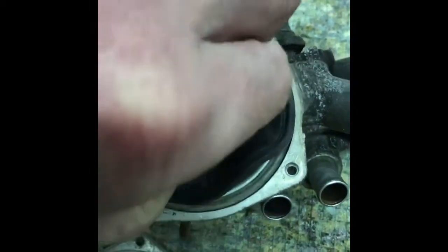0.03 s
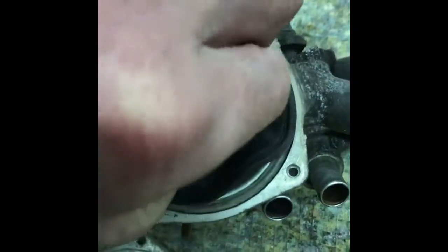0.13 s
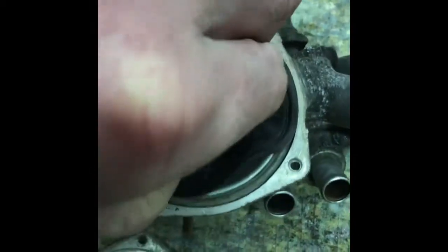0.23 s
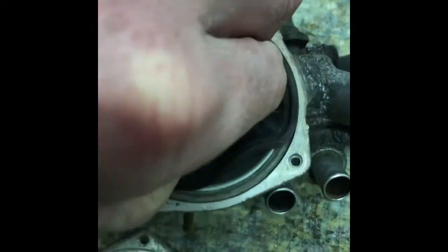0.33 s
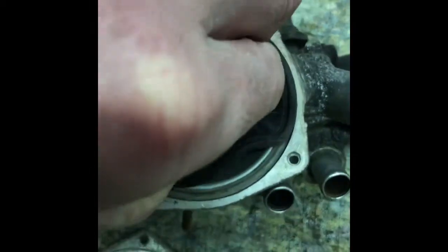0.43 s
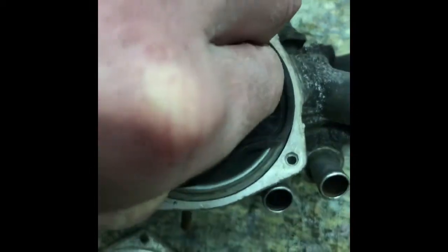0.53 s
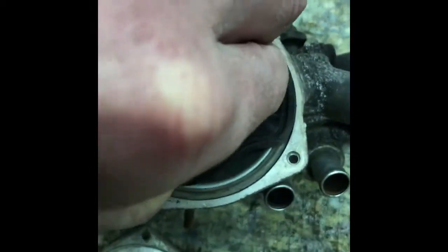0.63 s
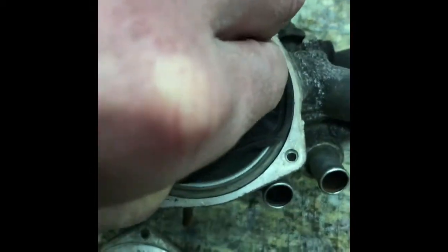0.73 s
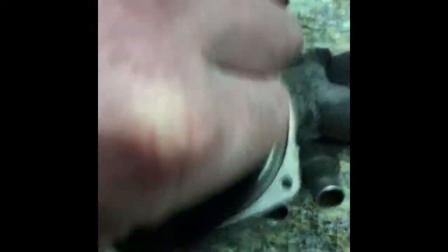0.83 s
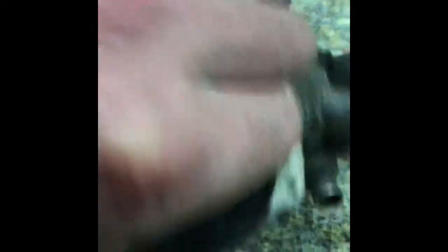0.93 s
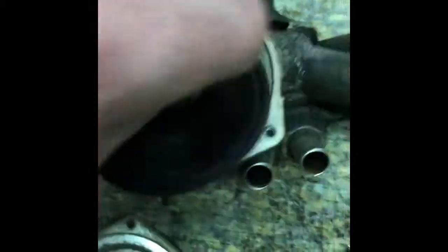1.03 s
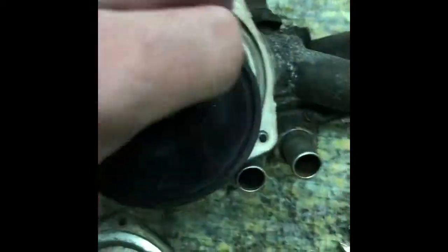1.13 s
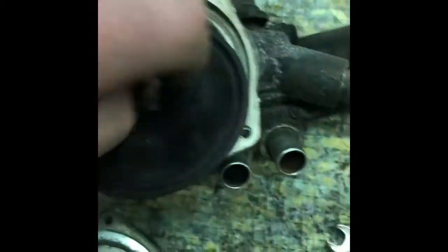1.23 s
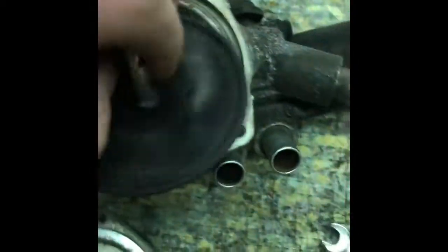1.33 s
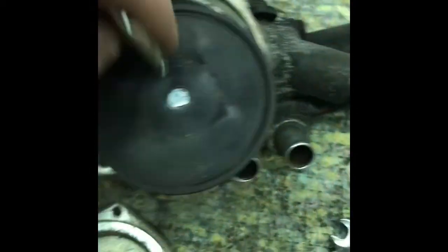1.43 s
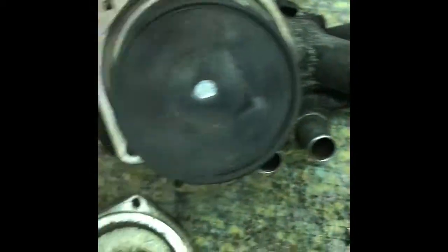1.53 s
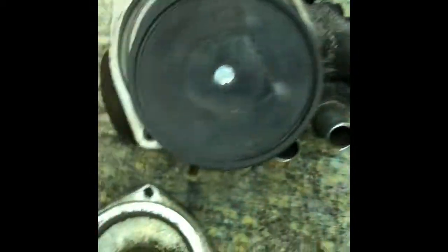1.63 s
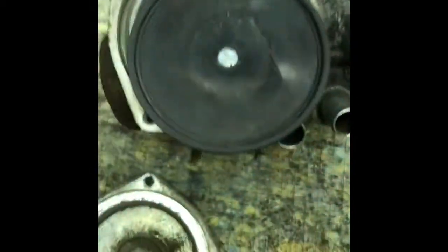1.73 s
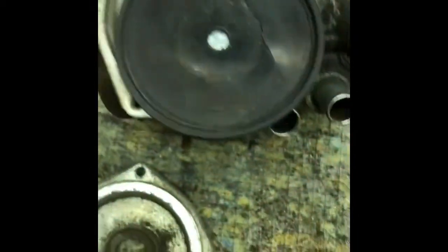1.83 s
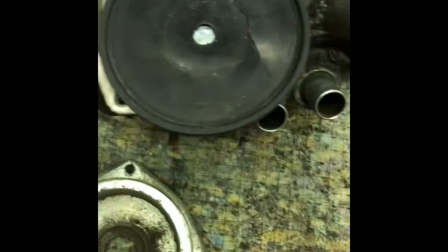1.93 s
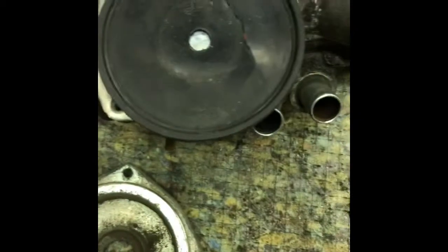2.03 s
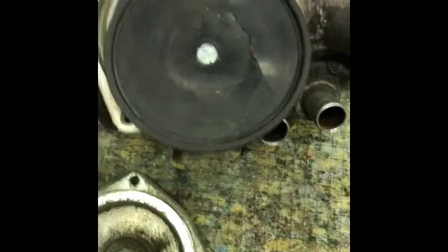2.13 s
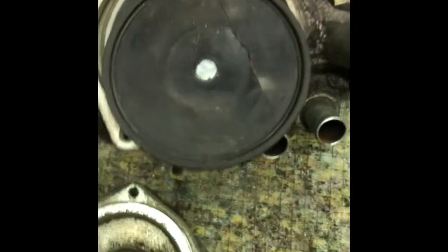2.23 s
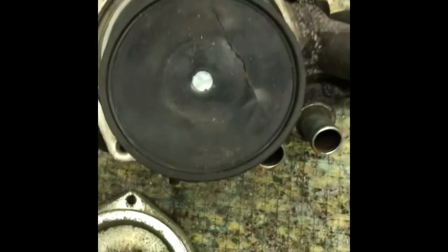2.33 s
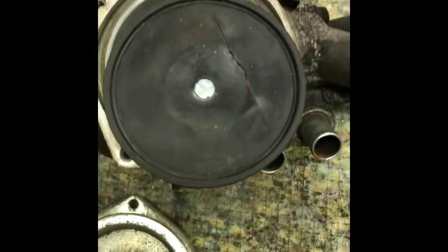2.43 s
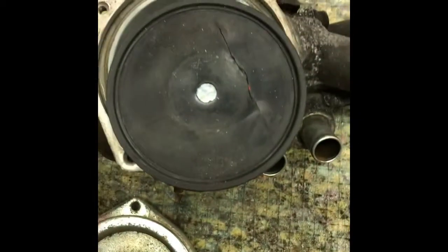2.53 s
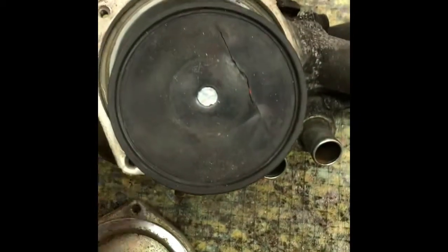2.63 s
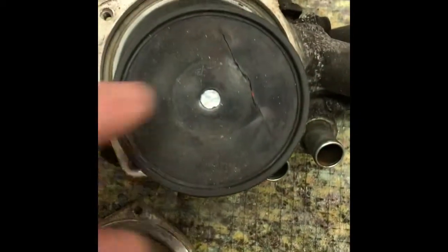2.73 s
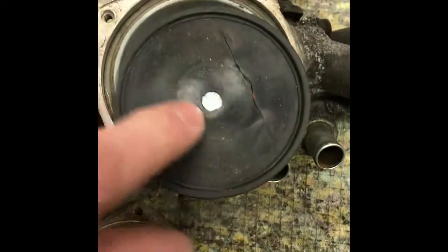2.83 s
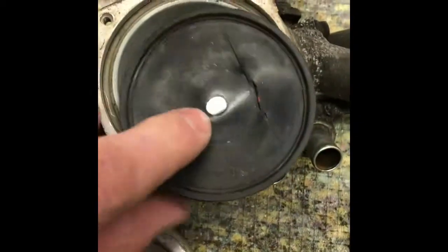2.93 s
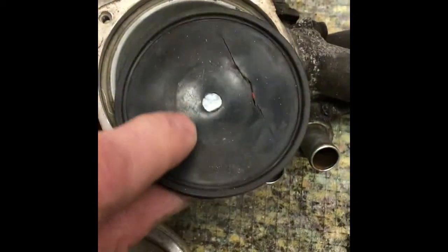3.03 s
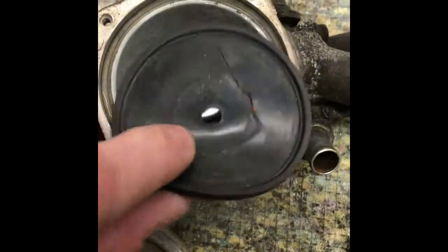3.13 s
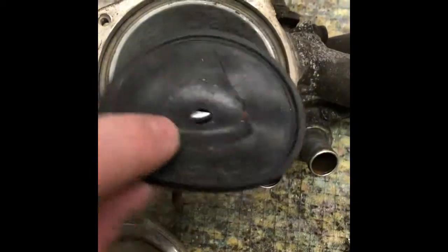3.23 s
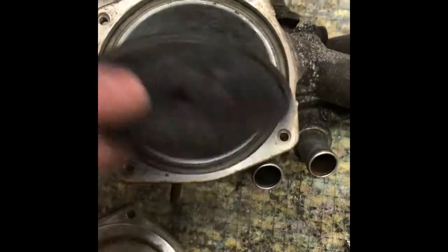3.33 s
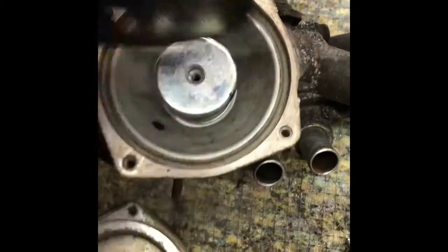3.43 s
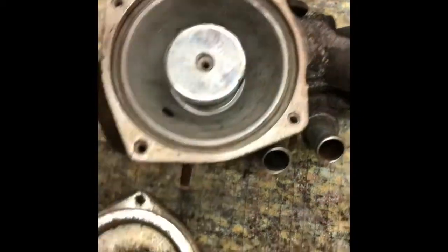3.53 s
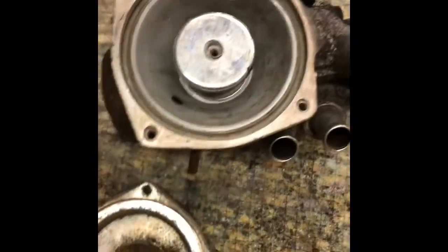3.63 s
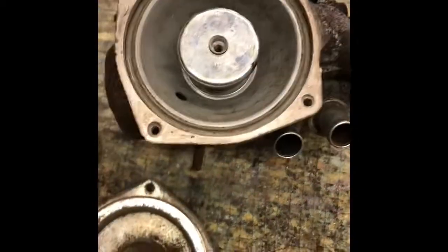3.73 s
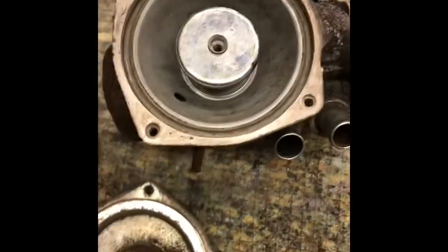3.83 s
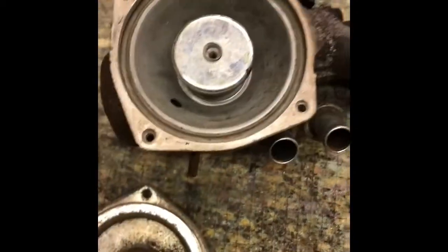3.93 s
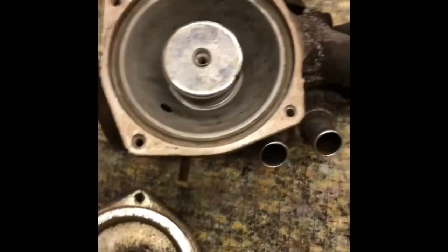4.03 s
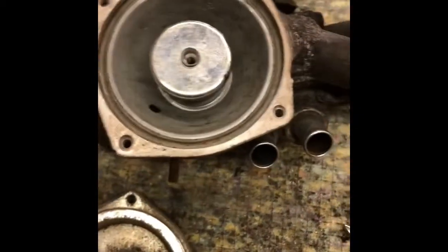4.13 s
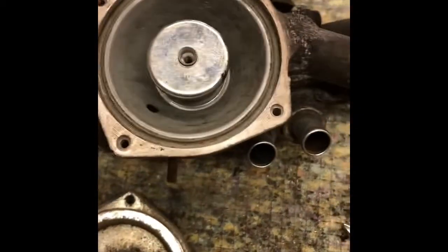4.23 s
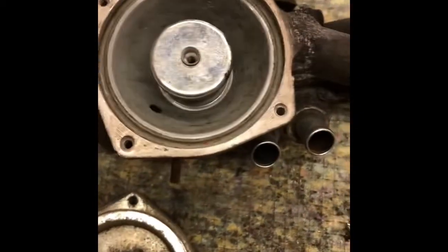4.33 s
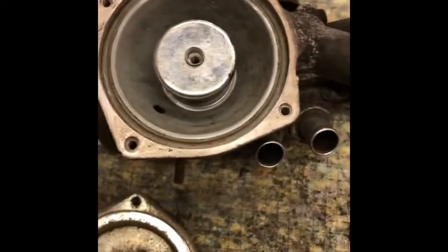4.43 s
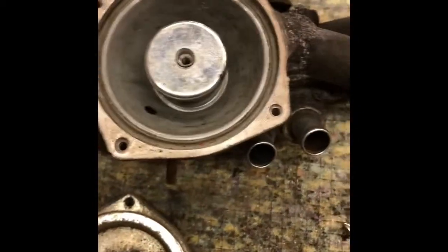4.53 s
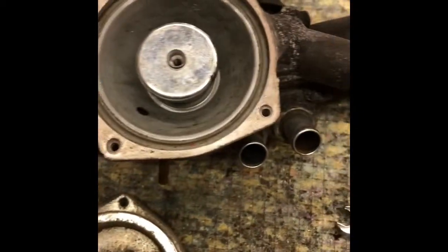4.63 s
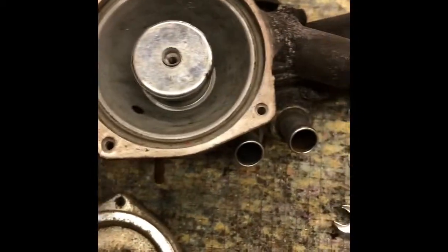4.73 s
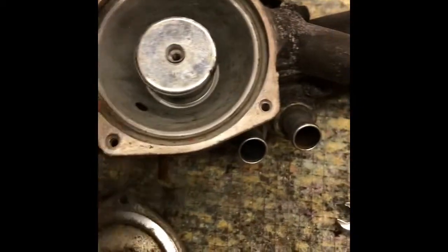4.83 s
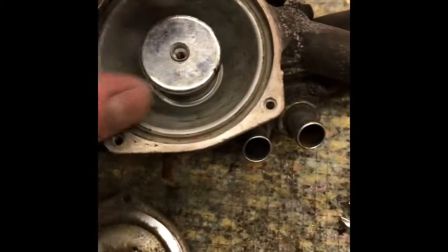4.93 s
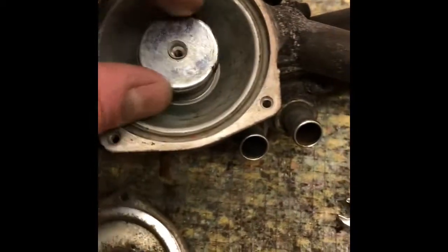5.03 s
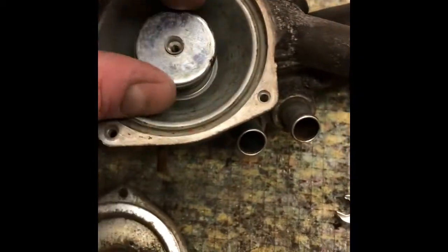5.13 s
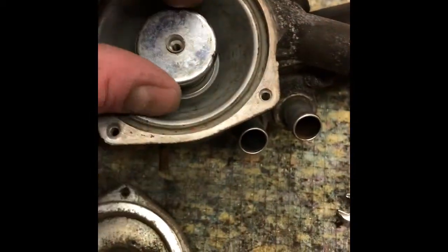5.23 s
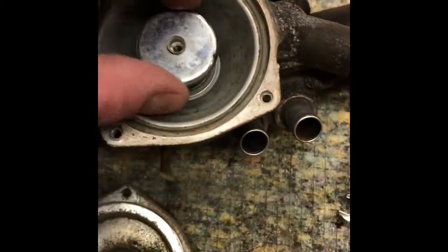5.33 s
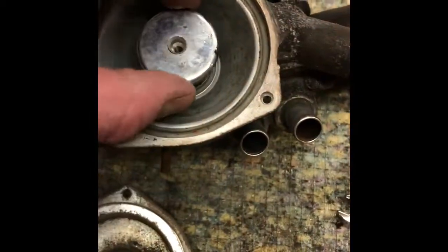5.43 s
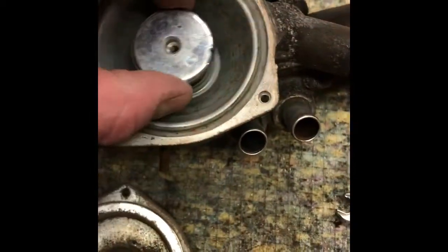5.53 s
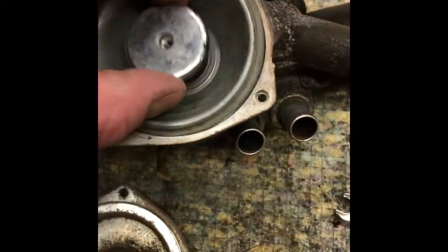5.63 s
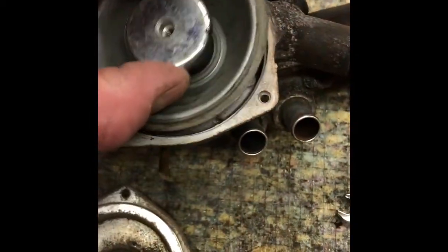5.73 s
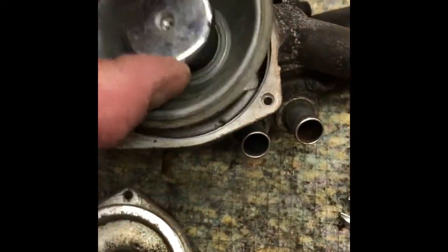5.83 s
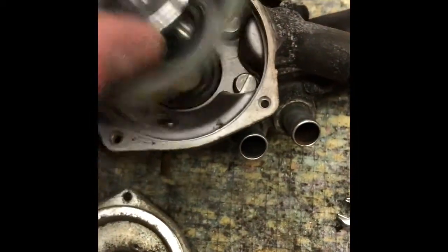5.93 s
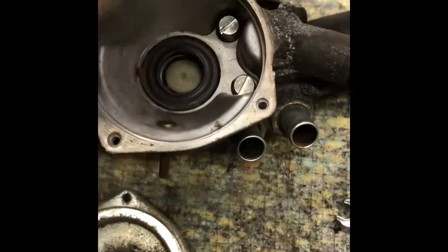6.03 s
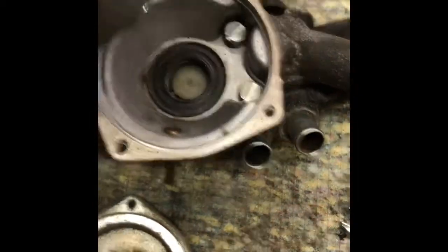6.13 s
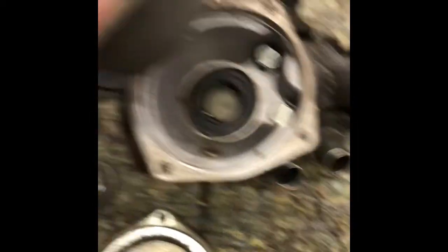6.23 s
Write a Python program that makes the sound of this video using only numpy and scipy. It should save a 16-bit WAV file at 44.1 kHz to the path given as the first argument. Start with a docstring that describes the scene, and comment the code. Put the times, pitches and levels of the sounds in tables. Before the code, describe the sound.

A small workshop, heard very close at the bench, with a quiet wavering low hum and soft dull air throughout. At 0.05 s a light hollow metal knock, with a little tick and rub near 0.3. From 0.83 to 0.91 a loud tight clatter of metal blows, with a dull bench thud; another firm knock comes at 1.08. Small rubbery snaps follow at 1.2 and 1.48 amid dry rubbing, then a metallic clack at 1.81. Faint finger rubs lead to a crisp, dead rubber snap at 2.93 and brief rubbing until 3.3. Then it is nearly still, with slight grip rustles and a tiny pop at 4.55. At 5.1 a thin fingernail tick; from 5.15 a piston rasps in short fits, clacks at 5.53, and clinks free brightly at 5.74. Light fingertip brushes make it sing faintly at 6.0 and 6.27. The echo is weak and short.

```python
"""In a workshop, on a bench, a cast metal valve housing is taken apart by hand, close to the listener.
It knocks and rattles as its lid comes off: short bursts of noise ring its hollow and its walls.
A rubber diaphragm snaps loose, fingers rub, and a small piston scrapes and clinks out of its bore:
noise shaped by rubber and bore, and a set of fading tones for the piston.
Wavering tones for mains equipment and a fan, and soft filtered noise for the air, lie underneath."""
import sys
import numpy as np
from scipy import signal
from scipy.fft import rfft, irfft
from scipy.io import wavfile
from scipy.ndimage import uniform_filter1d

SR = 44100
rng = np.random.default_rng(int(sys.argv[2]) if len(sys.argv) > 2 else 0)


def inscribe(sig):
    """Save sig as 16-bit PCM at rate SR to the path in sys.argv[1].

    A 1-D sig is mono; a 2-D sig holds one channel per row.
    Samples are clipped to [-1, 1] before scaling.
    """
    pcm = np.round(np.clip(np.atleast_2d(sig).T, -1, 1) * 32767)
    wavfile.write(sys.argv[1], SR, pcm.astype(np.int16))


N = 276948
T = np.arange(N) / SR  # time through the whole scene, s
BLOW_T = np.arange(int(.45 * SR)) / SR  # time since a single blow, s


def undb(db):
    """Turn decibels into a gain."""
    return 10 ** (np.asarray(db) / 20)


def unit(x):
    """Scale to an average (rms) level of 1."""
    return x / np.sqrt(np.mean(x ** 2))


def blow_level(x, db):
    """Give a blow the energy of a 5 ms sound at this level."""
    return x * undb(db) * np.sqrt(.005 * SR / np.sum(x ** 2))


def fade(t, t60):
    """Die away smoothly, dropping 60 dB in t60 seconds."""
    return np.exp(-np.log(1000) * t / t60)


def band(x, lo_hz, hi_hz, order=3):
    """Keep only the pitches between two limits."""
    return signal.sosfilt(signal.butter(order, [lo_hz, min(hi_hz, SR / 2 - 1)], "band", fs=SR, output="sos"), x)


def resonate(x, modes):
    """Pass a sound through damped resonances (f/Hz, width/Hz, level/dB) and add them up."""
    return sum(undb(db) * signal.lfilter(*signal.iirpeak(hz, hz / width, SR), x) for hz, width, db in modes)


def add(out, s, x):
    """Mix x in at time s."""
    i = max(int(s * SR), 0)
    out[i:i + len(x)] += x[:max(N - i, 0)]


def walk(rate):
    """Wander smoothly at random, about rate new values a second, with spread 1."""
    k = int(SR / rate)
    steps = np.repeat(rng.standard_normal(N // k + 1), k)
    return unit(uniform_filter1d(steps, k)[:N])


def contact(t, t60, build_s=0.00038, tail_db=-27, tail_t60=0.058):
    """Metal meets metal: a dense crack builds quickly, then weaker chatter lasts longer."""
    noise = rng.standard_normal(len(t)) * (1 - np.exp(-t / build_s))
    return noise * (fade(t, t60) + undb(tail_db) * fade(t, tail_t60))


def grit(rough_db, rate):
    """Friction: surface grains catch and let go at random, so the noise is uneven."""
    return unit(rng.standard_normal(N) * undb(rough_db * walk(rate)))


def strokes(rows):
    """Level of the hand's strokes (peak t/s, length/s, level/dB): each swells and dies away alike."""
    rise_share = .43  # part of a stroke spent swelling
    power = 0
    for s, length, db in rows:
        u = (T - s) / (length * np.where(T < s, rise_share, 1 - rise_share))
        power = power + undb(2 * db) * np.exp(-np.minimum(2 * u ** 2, 40))
    return np.sqrt(power)


# hum of mains equipment and a fan: f/Hz, level/dB, waver of the pitch/Hz
HUM_TONES = [(126, -73, 0.26), (162, -69.5, 2.2), (204.5, -57.5, 1.3), (240.5, -58.5, .3), (292.5, -69, 3),
             (355, -73.5, 0.29), (464, -77.5, 0.51)]
# colour of the workshop air: f/Hz, relative level in each Hz/dB
AIR_COLOUR = [(20, -28), (33, -23), (48, -15.5), (90, -7.5), (140, -11), (200, 3), (265, -1.5), (400, -9.5),
              (700, -18.5), (920, -16.5), (2000, -29), (2800, -29.5), (7000, -36.5), (16000, -42.5)]


def workshop(flutter_db=2.0, air_db=-56.5):
    """Hum tones waver in pitch and strength over a soft rush of air, which is filtered noise."""
    tones = np.zeros(N)
    for hz, db, waver in HUM_TONES:
        tone = np.sin(2 * np.pi * np.cumsum(hz + waver * walk(12)) / SR)
        tones += undb(db + flutter_db * walk(5)) * unit(tone)
    hz, db = np.transpose(AIR_COLOUR)
    bins_hz = np.arange(N // 2 + 1) * SR / N
    colour = undb(np.interp(np.log(bins_hz + 1), np.log(hz), db))
    air = unit(irfft(rfft(rng.standard_normal(N)) * colour, N))
    return tones + air * undb(air_db + .5 * walk(4.2))


def room(x, wet_db=-21, bright_db=-26, low_t60=0.56, treble_t60=0.31, build_s=0.0046):
    """A cluttered workshop echoes weakly, and the echo loses its treble first."""
    t = np.arange(SR) / SR
    noise = rng.standard_normal(SR) * (1 - np.exp(-t / build_s))
    low, high = noise * fade(t, low_t60), noise * fade(t, treble_t60)
    tail = undb(wet_db) * band(low / np.linalg.norm(low), 200, 4500, order=2)
    tail += undb(bright_db) * band(high / np.linalg.norm(high), 4100, 11000, order=2)
    return signal.fftconvolve(x, tail)[:N]


# faint thin squeaks: t/s, length/s, start f/Hz, middle f/Hz, end f/Hz, level/dB
SQUEAK_ARCHES = [(1.311, 0.16, 11300, 11160, 11700, -73.5), (1.592, 0.13, 7300, 7210, 7340, -78.5),
                 (2.635, 0.24, 12300, 13400, 13180, -84), (2.95, 0.31, 11900, 12000, 11400, -83),
                 (5.108, 0.0049, 11400, 10930, 10900, -50)]


def squeaks(waver=0.007, wander=0.009):
    """Thin unsteady whistles follow a curve in pitch and wander around it, fast and slow."""
    out = np.zeros(N)
    for s, length, *pitch, db in SQUEAK_ARCHES:
        u = np.linspace(0, 1, int(length * SR))
        arch = np.polyval(np.polyfit([0, .5, 1], pitch, 2), u)
        hz = arch * (1 + waver * walk(600) + wander * walk(17))[:len(u)]
        whistle = unit(np.sin(np.pi * u) * np.sin(2 * np.pi * np.cumsum(hz) / SR))
        add(out, s, undb(db + 4 * walk(63)[:len(u)]) * whistle)
    return out


# the casting rocks on the bench: t/s, level before the last filter/dB
BENCH_THUMPS = [(.829, -31.5), (0.852, -40.5), (0.907, -54)]


def thumps(t60=0.12):
    """The bench top answers the heavy blows with a dull thud of low noise."""
    out = np.zeros(N)
    for s, db in BENCH_THUMPS:
        thud = rng.standard_normal(len(BLOW_T)) * fade(BLOW_T, t60)
        add(out, s, blow_level(band(thud, 85, 340, order=1), db))
    return band(out, 30, 300)


def nail(nail_s=5.1092, nail_db=-53, t60=0.009):
    """A fingernail catches the piston's rim: one thin dry tick."""
    out = np.zeros(N)
    tick = band(contact(BLOW_T, t60, tail_db=-41.5), 2500, 9600, order=2)
    add(out, nail_s, blow_level(tick, nail_db))
    return out


# fingers and rubber rub on the casting: peak t/s, length/s, level/dB, brightness (hiss over rasp)/dB
RUB_STROKES = [(0.289, .022, -59, 3), (0.332, .086, -74.5, 2), (1.03, 0.15, -62, -1),
               (1.3, 0.14, -74.5, -3.5), (1.421, .066, -63, 0.5), (1.628, 0.25, -70.5, 8),
               (2.375, 0.073, -72, 2.5), (2.943, 0.044, -55.5, 1.5), (3.033, 0.022, -55.5, -4),
               (3.058, 0.056, -64.5, -4.5), (3.16, 0.057, -61.5, -2), (3.271, .12, -80.5, -9),
               (3.606, 0.081, -68.5, 8), (3.93, 0.087, -70, 2), (4.171, 0.038, -64, 4),
               (4.532, 0.072, -72, -0.5)]
# the fingers shift their grip: from t/s, to t/s, level/dB
GRIP_SHIFT = (3.36, 4.15, -80.5)


def rubs(air_db=-7, air_per_bright=0.59, fidget_db=3):
    """Skin and rubber rub dryly without ringing: bright strokes hiss, dark ones rasp."""
    friction = grit(rough_db=2.5, rate=620)
    start, end, grip_db = GRIP_SHIFT
    shifting = uniform_filter1d(1. * ((T > start) & (T < end)), SR // 10)
    fidget = undb(grip_db + fidget_db * walk(18)) * shifting

    def level(offset_db, per_bright):
        """Level of strokes and grip together, shifted by the brightness of each stroke."""
        rows = [(s, length, db + offset_db + per_bright * bright) for s, length, db, bright in RUB_STROKES]
        return np.hypot(fidget, strokes(rows))

    rasp = level(0, -1) * unit(band(friction, 1800, 3300, order=2))
    hiss = level(0, 0) * unit(band(friction, 4860, 9420))
    air = level(air_db, air_per_bright) * unit(band(friction, 10000, 16000))
    return rasp + hiss + air


# the rubber diaphragm unsticks: t/s, snap level/dB, crackle level/dB, contact t60/s
RUBBER_SNAPS = [(1.205, -41.5, -57, 0.017), (1.262, -60, -65, .013), (1.48, -47, -59, 0.0085),
                (2.916, -47.5, -67.5, .008), (2.922, -51.5, -63.5, .017), (2.931, -45.5, -46, 0.011),
                (2.935, -32.5, -58, 0.01), (2.9555, -53, -55, .017), (4.51, -64.5, -67, 0.014),
                (4.5512, -55, -66, .012)]
# resonances of the diaphragm: f/Hz, width/Hz, level/dB
RUBBER_MODES = [(1369.4, 160, -13), (1900, 400, 2), (2570, 264, -8.5), (3610, 436, -11)]


def snaps():
    """Rubber lets go of the metal with a short dead snap and a little crackle."""
    out = np.zeros(N)
    for s, db, crackle_db, t60 in RUBBER_SNAPS:
        crack = contact(BLOW_T, t60, tail_db=-28)
        snap = band(resonate(crack, RUBBER_MODES), 1050, 4300, order=2)
        crackle = band(crack, 5800, 11800)
        add(out, s, blow_level(snap, db) + blow_level(crackle, crackle_db))
    return out


# ringing tones of the piston when nothing holds it: f/Hz, level/dB, t60/s
PISTON_MODES = [(1477, -28, 0.18), (2245, -7, 0.24), (2264, -13.5, 0.058), (2647, -6.5, 0.06),
                (4040, -22.5, 0.069), (5580, -18.5, 0.29), (7170, -2, 0.073), (7310, 0.5, 0.062),
                (7250, -3, 0.14), (7440, -20.5, 0.17), (7953, 8.5, 0.058), (8300, -13, .22),
                (7900, 3, 0.049), (8500, 4, 0.065), (9200, -23, 0.26), (8900, -14, 0.06), (10100, 3, 0.07),
                (9800, -6, 0.12), (10760, -15, 0.1625), (11940, -2, 0.09), (12210, -29, 0.23),
                (13500, -13.5, 0.073), (13000, -23, 0.22), (13600, -26, .035), (14450, -13.5, 0.22),
                (14670, -18, 0.083), (15400, -7, 0.064)]


def piston_ring(t, scatter_db=2, detune=0.00054, lasting=0):
    """Each touch weights the piston's tones anew; above 0, lasting favours the slow to fade."""
    hz, db, t60 = np.transpose(PISTON_MODES)[:, :, None]
    size, drift, phase = rng.standard_normal((3, len(PISTON_MODES), 1))
    gain = undb(db + scatter_db * size) * t60 ** lasting
    tones = np.sin(2 * np.pi * (hz * (1 + detune * drift) * t + phase))
    return np.sum(gain * fade(t, t60) * tones, axis=0)


def sing(force, ring):
    """A lasting force keeps a ring going."""
    return signal.fftconvolve(force, ring / np.linalg.norm(ring))[:N]


# the piston slides in its bore: peak t/s, length/s, level/dB
SLIDE_STROKES = [(1.803, 0.019, -46), (5.072, 0.068, -62.5), (5.167, .039, -57), (5.253, 0.019, -63),
                 (5.293, 0.037, -54.5), (5.338, 0.091, -57), (5.408, 0.092, -57), (5.53, 0.069, -55.5),
                 (5.637, 0.038, -56), (5.702, .048, -54.5)]
# fingertips brush the free piston: peak t/s, length/s, ring level/dB
FINGER_BRUSHES = [(5.996, 0.036, -58.5), (6.12, 0.062, -70), (6.272, .1, -54.5)]
# resonances of the bore under the scraping piston: f/Hz, width/Hz, level/dB
BORE_MODES = [(1502, 226, 4), (2160, 740, 3), (3300, 4360, -10.5), (7750, 160, 2.5), (9800, 370, -14)]


def slides(ring_db=-11, rasp_db=1.0, hiss_db=-13, grip_t60=0.014, lasting=1.4, touch_t60=0.62, skin_db=-8):
    """In the bore the piston rasps in fits, its ring damped; free, it sings under the fingertips."""
    exit_s, exit_length_s = 5.56, .03  # the piston's skirt clears the bore
    exit_rasp_db, exit_ring_db = -9.5, 4  # then it rasps less and rings more
    friction = unit(grit(rough_db=3, rate=700) * undb(2.2 * walk(80)))
    clear = .5 + .5 * np.tanh((T - exit_s) / exit_length_s)  # 0 inside the bore, 1 outside
    effort = strokes(SLIDE_STROKES)
    push = effort * undb(exit_ring_db * clear)
    drag = effort * undb(exit_rasp_db * clear)
    held_ring = piston_ring(BLOW_T) * fade(BLOW_T, grip_t60)
    held = undb(ring_db) * sing(friction * push, held_ring)
    # under a light steady touch the least damped tones build up most
    brush = strokes(FINGER_BRUSHES)
    touch = unit(band(friction, 3600, 18000, order=1)) * brush
    free_ring = piston_ring(BLOW_T, scatter_db=3.5, lasting=lasting) * fade(BLOW_T, touch_t60)
    free = sing(touch, free_ring)
    rasp = undb(rasp_db) * drag * unit(band(resonate(friction, BORE_MODES), 1040, 13700, order=2))
    hiss_level = undb(hiss_db) * push + undb(skin_db) * brush
    hiss = hiss_level * unit(band(friction, 5000, 15000, order=2))
    return held + free + rasp + hiss


# the piston touches its bore: t/s, ring level/dB, bore clack level/dB, bore edge over the clack/dB
PISTON_TOUCHES = [(1.1333, -47.5, -60.5, 1), (1.7892, -57, -46, -18), (1.799, -55, -40.5, -22),
                  (1.8046, -51.5, -43.5, -19), (1.8097, -43, -32.5, -16), (1.823, -58, -44, -8),
                  (5.155, -57, -49, -14), (5.3549, -50.5, -47, -1.5), (5.5297, -41.5, -38.5, 0),
                  (5.533, -43.5, -59, 10), (5.548, -52, -67, -4), (5.569, -41, -51, -22),
                  (5.631, -50, -64, 1), (5.643, -49, -52, -20), (5.673, -56, -66, -4),
                  (5.716, -55, -60.5, 1.5), (5.727, -43.5, -50.5, -0.5), (5.737, -25.5, -33.5, -3),
                  (5.7448, -35.5, -44, -4.5), (5.758, -37.5, -53, 4)]


def clinks(ring_db=1, bore_db=-1, bore_t60=0.0096, tick_db=-10, thud_db=-11):
    """The piston rings, damped more until it comes free; the bore answers with a clack and a ping."""
    free_s, held_t60, free_t60 = 5.732, 0.13, 1.7  # moment it comes free; damping before and after
    ping_hz, ping_t60, ping_db = 2320, 0.045, 1
    out = np.zeros(N)
    for s, db, clack_db, edge_db in PISTON_TOUCHES:
        crack = contact(BLOW_T, bore_t60)
        grip = fade(BLOW_T, held_t60 if s < free_s else free_t60)
        ping = np.sin(2 * np.pi * ping_hz * BLOW_T) * fade(BLOW_T, ping_t60)
        add(out, s, blow_level(piston_ring(BLOW_T) * grip, db + ring_db))
        add(out, s, blow_level(band(crack, 350, 1300, order=2), clack_db + thud_db))
        add(out, s, blow_level(band(crack, 1140, 1700), clack_db + bore_db))
        add(out, s, blow_level(band(crack, 2700, 4020), clack_db + edge_db))
        add(out, s, blow_level(band(crack, 7100, 13230), db + tick_db))
        add(out, s, blow_level(ping, clack_db + edge_db + ping_db))
    return out


# resonances of the housing's walls: f/Hz, width/Hz, level over the bare contact/dB
WALL_MODES = [(1330, 89, 8), (1436, 200, 16), (1880, 140, 5), (3000, 250, -2), (3360, 480, 6),
              (4197, 350, 8.5), (5983, 640, 1), (6823, 100, 5), (8235, 47, 2.5), (11670, 190, 4),
              (12430, 210, 6.5), (14630, 670, 5.5)]


def housing(x):
    """The casting adds its damped resonances to a contact force."""
    return x + resonate(x, WALL_MODES)


# knocks on the housing: t/s, strength/dB, hollow (how much the cavity rings)/dB,
# tilt/dB per octave, contact t60/s, cavity f/Hz
HOUSING_KNOCKS = [(0.0534, -38.5, 2.5, 3, 0.0056, 497), (0.3, -54.5, -5, 1, 0.03, 484),
                  (.389, -61, -7, -1.4, 0.037, 490), (0.8274, -27.5, -7.5, -4, 0.006, 761.7),
                  (0.8315, -21, -16, 1, .006, 677), (.8368, -30.5, -4, -2.2, 0.087, 654),
                  (.85, -23, -9.5, -2, 0.01, 490), (.854, -25.5, -8.5, 0, 0.047, 497),
                  (.873, -19.5, -14, -2.5, 0.005, 740), (0.8819, -31, -15.5, 0.5, 0.013, 706),
                  (.8897, -31, -12.5, 1.5, .007, 692), (.9068, -35.5, -9.5, -1, .013, 674),
                  (.911, -35.5, 4, -0.5, 0.032, 630), (0.9371, -45, -9, -3, 0.0089, 720),
                  (1.021, -44.5, -4, -1, 0.049, 734), (1.064, -43.5, -3, -2, 0.071, 684),
                  (1.0803, -41.5, -7, -9, 0.0095, 516), (1.0835, -27.5, -4, -1.5, .014, 507),
                  (1.0982, -44, -10, 3.5, 0.031, 490), (1.157, -56.5, 4, -4, 0.03, 564)]
# edges of the five pitch registers of a crack, lowest first: f/Hz
REGISTER_EDGES = [350, 1050, 2400, 5200, 10000, 17000]
# air tones of the cavity: multiple of the cavity f, relative level/dB
CAVITY_MODES = [(1, 3), (2.42, -9.5), (2.95, -7.5), (3.82, -9.5)]


def knocks(cavity_t60=0.046, knock_db=-7):
    """Each blow rings the hollow and cracks through the walls; a harder contact tilts the crack upward."""
    wall_db, wall_per_hollow = -8, .75  # a blow that rings the cavity rings the wall less
    sizzle_db, sizzle_per_hollow = -3.5, .35  # and it sizzles more at the top
    pivot_hz = 4003  # centre of the tilt
    out = np.zeros(N)
    edges = np.array(REGISTER_EDGES)
    octaves = np.log2(np.sqrt(edges[1:-1] * edges[2:]) / pivot_hz)  # the four upper registers
    for s, db, hollow_db, tilt, t60, cavity_hz in HOUSING_KNOCKS:
        crack = housing(contact(BLOW_T, t60))
        wall = wall_db - wall_per_hollow * hollow_db
        sizzle = sizzle_db + sizzle_per_hollow * hollow_db
        colour = tilt * octaves + np.array([0, wall, 0, sizzle])
        for register_db, lo, hi in zip([hollow_db + knock_db, *colour], edges, edges[1:]):
            add(out, s, blow_level(band(crack, lo, hi), db + register_db))
        hollow = sum(undb(mode_db) * np.sin(2 * np.pi * cavity_hz * multiple * BLOW_T)
                     for multiple, mode_db in CAVITY_MODES)
        add(out, s, blow_level(hollow * fade(BLOW_T, cavity_t60), db + hollow_db))
    return out


def scene():
    """The handled parts, their echo in the room, and the workshop hum."""
    parts = squeaks() + thumps() + nail() + rubs() + snaps() + slides() + clinks() + knocks()
    return (workshop() + room(parts) + parts)[None]


def record(dry, rumble_hz=38, top_hz=16200):
    """The recorder cuts the deep bass and the very top."""
    no_rumble = signal.sosfilt(signal.butter(4, rumble_hz, "high", fs=SR, output="sos"), dry)
    return signal.sosfilt(signal.ellip(10, .2, 80, top_hz, fs=SR, output="sos"), no_rumble)


dry = scene()
out = record(dry)
inscribe(out)
```